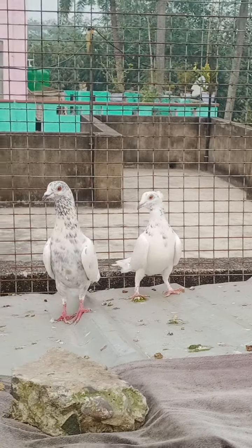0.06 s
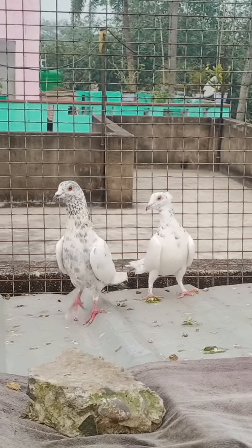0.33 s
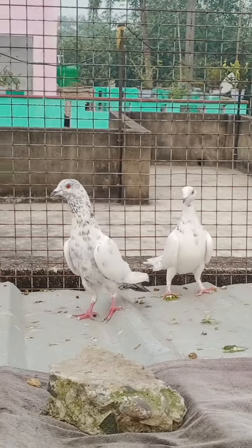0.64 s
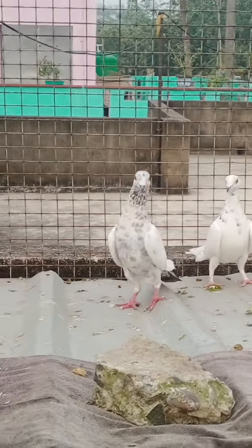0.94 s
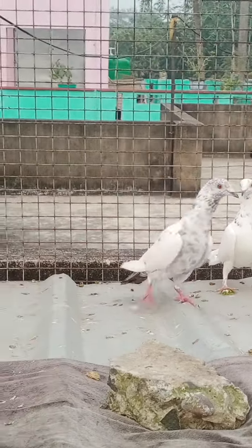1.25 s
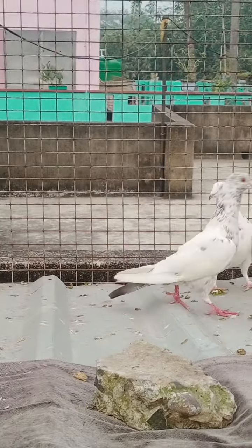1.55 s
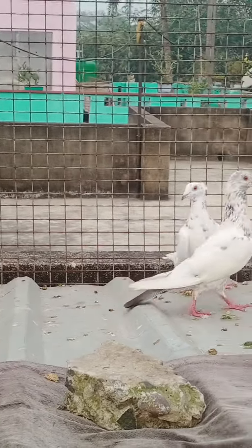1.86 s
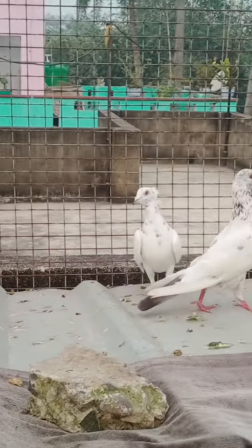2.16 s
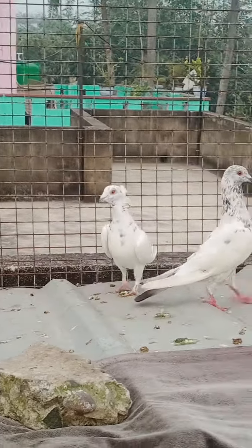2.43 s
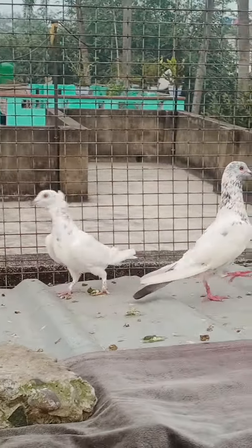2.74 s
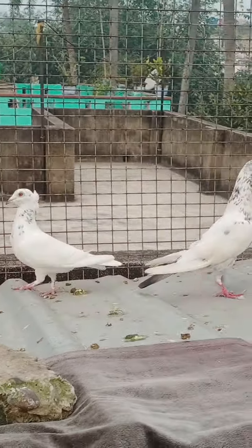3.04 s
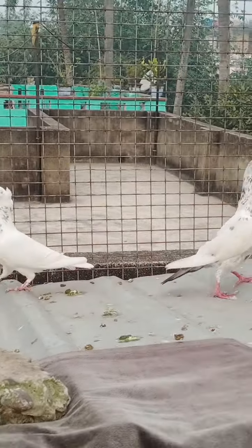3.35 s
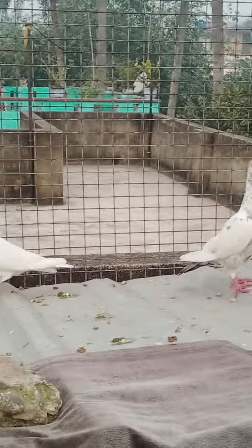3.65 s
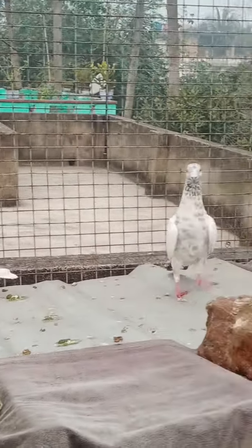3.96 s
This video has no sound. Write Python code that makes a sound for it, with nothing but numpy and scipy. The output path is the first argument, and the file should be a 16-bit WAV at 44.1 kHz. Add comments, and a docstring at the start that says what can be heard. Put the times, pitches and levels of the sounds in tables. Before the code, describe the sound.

Pigeon claws patter and tick on a sheet-metal roof while wild birds call around.

```python
"""Two pigeons walk on a sheet-metal roof, close to the microphone, in mono. Their claws patter, tick
and skid and set the metal ringing, their soles scuff, and the sheet flexes with a soft boom.
In the trees around, wild birds screech, whistle, squawk, trill and chirp, smeared by leaves and
echoed by walls. One bird calls long and low from far off, over a bed of quiet outdoor air."""
import sys
import numpy as np
from scipy import signal
from scipy.fft import rfft, irfft, next_fast_len
from scipy.io import wavfile
from scipy.ndimage import uniform_filter1d

SR = 44100
rng = np.random.default_rng(int(sys.argv[2]) if len(sys.argv) > 2 else 0)


def store_pcm(level_fs):
    """Save levels as 16-bit WAV."""
    pcm = np.round(np.clip(level_fs, -1, 1) * 32767).astype(np.int16)
    wavfile.write(sys.argv[1], SR, np.atleast_2d(pcm).T)


N = 176400

# footfalls (time [s], level [dB], claw patter [s], clank re level [dB], bright edge re level [dB])
FOOTFALLS = [(.395, -35.5, 0.027, -15, -12), (1.113, -37, 0.028, -13.5, -10),
             (1.522, -44.5, 0.018, -17, -9), (1.801, -36.5, 0.017, -32, -6), (2.137, -38.5, 0.038, -13, -5),
             (2.473, -42, 0.024, -24, -5.5), (2.556, -41, 0.0032, -38, -8.5),
             (2.690, -39.5, 0.031, -11, -13), (2.846, -39.5, 0.029, -12.5, -9),
             (3.431, -44, 0.043, -12, -10), (3.589, -44.5, 0.019, -59, -6),
             (3.788, -44.5, 0.021, -19, -11.5)]
# spectra of the sheet: its ring, low clank and bright edge when scratched (frequency [Hz], gain [dB])
RING_SPECTRUM = [(1500, -40.5), (2300, -16.5), (3200, -2), (4200, -3.5), (4800, -5), (5700, -0.5),
                 (6600, -7.5), (7500, -29.5), (9500, -43.5), (16000, -54.5)]
CLANK_SPECTRUM = [(100, -20.5), (350, -18.5), (560, 0.5), (850, -14.5), (1100, -4), (1450, 5),
                  (1900, -11.5), (2600, 0.5), (4000, -5), (9000, -72.5)]
SCRATCH_SPECTRUM = [(4000, -19), (7500, 1), (8600, -2), (9500, -17), (11300, -7), (13000, 3.5),
                    (15700, 1.5)]

RING_T60_S, CLANK_T60_S, EDGE_T60_S = 0.13, 0.17, 0.087
SCRATCHES_PER_S, SCRATCH_SCATTER_DB = 800, 7.5
FIRST_CLAW = 1.45  # strength of the first contact, against 1 for a typical one


def undb(db):
    """Decibels to gain."""
    return 10 ** (np.asarray(db) / 20)


def unit(x):
    """Scale to rms 1."""
    return x / np.sqrt(np.mean(x ** 2) + 1e-20)


def peak_level(x, db):
    """Set the level of the loudest 10 ms."""
    return x * undb(db) / np.sqrt(uniform_filter1d(x ** 2, SR // 100).max() + 1e-20)


def clock(length):
    """Sample times over a length in seconds."""
    return np.arange(max(int(length * SR), 8)) / SR


def add(out, start, x):
    """Mix a sound in at a time in seconds."""
    i = max(int(start * SR), 0)
    out[i:i + len(x)] += x[:max(N - i, 0)]


def colour(x, points):
    """Minimum-phase filter through (frequency [Hz], gain [dB]) points, scaled to unit power gain."""
    size = next_fast_len(len(x) + 2048) * 2
    hz, db = np.array(points, float).T
    log_hz = np.log(np.fft.rfftfreq(size, 1 / SR) + 1)
    gain = unit(undb(np.interp(log_hz, np.log(hz), db)))
    cepstrum = irfft(np.log(gain))
    cepstrum[1:size // 2] *= 2
    cepstrum[size // 2 + 1:] = 0
    return irfft(rfft(x, size) * np.exp(rfft(cepstrum)))[:len(x)]


def drift(t, rate):
    """Random drift that turns rate times a second."""
    return np.interp(t * rate, np.arange(2048), rng.standard_normal(2048))


def tail(t60):
    """Dense dying ring of unit energy."""
    t = clock(0.97)
    x = rng.standard_normal(len(t)) * np.exp(-np.log(1000) * t / t60)
    return x / np.linalg.norm(x)


def yard(x, wet_db, near_db=2):
    """On its way to the microphone a call is smeared by leaves and echoed by walls, treble dying first."""
    out = x + undb(near_db) * signal.fftconvolve(x, tail(t60=0.061))[:N]
    echo = sum(signal.sosfilt(signal.butter(4, 4600, band, fs=SR, output="sos"), tail(t60))
               for band, t60 in (("low", 0.65), ("high", 0.48)))
    add(out, 0.012, undb(wet_db) * signal.fftconvolve(x, echo))
    return out / np.sqrt(1 + undb(near_db) ** 2 + undb(wet_db) ** 2)


def voice(hz, harmonics_db=(0,)):
    """A bird's tone on a pitch curve."""
    phase = 2 * np.pi * np.cumsum(hz) / SR
    return np.sqrt(2) * sum(undb(db) * np.sin((k + 1) * phase) for k, db in enumerate(harmonics_db))


def notes(rows, waver, waver_hz, bend=1):
    """Gliding notes that swell and fade; the pitch wavers by a share of itself."""
    out = np.zeros(N)
    for start, length, first_hz, last_hz, db in rows:
        t = clock(length)
        progress = t / t[-1]
        glide = first_hz + (last_hz - first_hz) * progress ** bend
        hz = glide * (1 + waver * drift(t, waver_hz))
        swell = np.abs(np.sin(np.pi * progress)) ** 0.32
        add(out, start, undb(db) * swell * voice(hz))
    return out


def air():
    """Quiet outdoor air all around: it rises a little at first, then swells and sinks gently."""
    # background spectrum (frequency [Hz], gain [dB])
    spectrum = [(20, -12.5), (45, -8), (80, 5.5), (140, 6), (250, 3), (450, -5), (900, -6.5), (1500, -6),
                (2500, -15), (4000, -11), (6000, -23), (8000, -40), (16000, -49.5)]
    t = np.arange(N) / SR
    db = -67.3 - 2.5 * np.clip(1 - t / 0.81, 0, 1) + drift(t, rate=5)
    return unit(colour(rng.standard_normal(N), spectrum)) * undb(db)


def screeches():
    """A harsh call from the trees arches and falls; a fast uneven rasp widens every harmonic."""
    # calls (time [s], gain [dB], pitch scale [ratio])
    calls = [(.066, -42.5, 0.98), (.762, -42.5, 0.98)]
    # course of a call (time into it [s], unscaled pitch [Hz], gain [dB], roughness [share of pitch])
    contour = [(0, 2150, -25, .06), (.028, 2420, -15.5, .055), (.068, 2290, -7, .032), (.10, 2160, -4, .02),
               (0.136, 2010, -2.5, .016), (0.164, 1930, -4.5, .022), (.185, 1790, -13, .03)]
    # harmonics ahead of the throat, fundamental first (gain [dB])
    harmonics = [-18, 0, -6.5, -9, -23.5, -32, -29]
    # resonances of the throat (frequency [Hz], gain [dB])
    throat = [(1500, -27.5), (2400, 10), (4200, 2), (5100, 2), (6100, -0.5), (6700, -9), (7200, -27),
              (8600, -16.5), (9400, -21), (10400, -9.5), (12000, -21), (15000, -13)]
    at, pitch, level, rough = np.array(contour).T
    out, t = np.zeros(N), clock(at[-1])
    fade = np.clip(np.minimum(t, t[-1] - t) / 0.0024, 0, 1)
    rasp_filter = signal.butter(3, 256, fs=SR, output="sos")
    for start, db, scale in calls:
        flutter = 1 + np.interp(t, at, rough) * drift(t, rate=801)
        hz = scale * np.interp(t, at, pitch) * flutter
        rasp = unit(signal.sosfilt(rasp_filter, rng.standard_normal(len(t))))
        envelope = undb(db + np.interp(t, at, level)) * fade
        add(out, start, envelope * (0.75 + rasp) * voice(hz, harmonics))
    return yard(colour(out, throat), wet_db=5.5, near_db=5.5)


def whistles():
    """Distant birds whistle short, nearly level notes."""
    # notes (time [s], length [s], start pitch [Hz], end pitch [Hz], level [dB])
    calls = [(.09, 0.14, 2110, 2029, -56), (.32, 0.11, 2107, 2058, -61.5), (.45, 0.069, 2103, 1961, -60.5),
             (.51, 0.054, 3830, 3796, -55.5), (.66, 0.1, 2180, 2065, -60.5), (.69, 0.19, 1390, 1316, -61.5),
             (.87, 0.12, 2155, 2044, -60), (.87, 0.19, 1344, 1327, -58), (1.05, 0.054, 1283, 1395, -55.5),
             (1.27, 0.085, 2180, 2050, -59.5), (1.29, 0.1, 1369, 1440, -55),
             (1.415, 0.029, 3740, 3570, -52), (1.46, 0.094, 3433, 3583, -54),
             (1.47, 0.066, 2187, 2130, -58), (1.68, 0.121, 1439, 1479, -52),
             (1.92, 0.097, 2030, 1976, -62.5), (2.125, 0.081, 1496, 1553, -46.5),
             (2.195, .04, 2700, 2760, -48), (2.43, 0.019, 1890, 1880, -61),
             (3.29, 0.044, 2750, 2766, -49.5), (3.38, 0.098, 3850, 4040, -55.5),
             (3.8, 0.095, 3000, 2686, -58), (3.84, 0.089, 3310, 3310, -61.5), (3.84, 0.07, 1480, 1565, -57)]
    return notes(calls, waver=0.019, waver_hz=271)


def claws(t, rate, scatter_db):
    """Random tiny contacts of uneven strength, about rate a second."""
    contacts = rng.random(len(t)) < rate / SR
    return contacts * undb(scatter_db * np.clip(rng.standard_normal(len(t)), -2, 2))


def sheet(push, spectrum, t60):
    """The sheet's answer to contacts: a crack and a dense short ring."""
    ring = tail(t60)[:SR // 4]
    ring[0] += 0.38  # the crack
    return signal.fftconvolve(push, colour(ring, spectrum))


def ring_modes(t, modes):
    """Separate modes of the sheet, each a dying sine."""
    return sum(undb(db) * np.sin(2 * np.pi * hz * t) * np.exp(-np.log(1000) * t / t60)
               for hz, db, t60 in modes)


def steps():
    """Close by, each foot lands claw after claw; the low clank builds a little later."""
    # clear modes that ring on after a footfall (frequency [Hz], relative level [dB], t60 [s])
    clear_modes = [(1074, -18, 0.23), (1240, -13, 0.56), (1364, 2, 0.21), (5630, 21, 0.023),
                   (6010, 9.5, 0.026)]
    # the claw's bright edge (frequency [Hz], gain [dB])
    edge_spectrum = [(4000, -39), (7500, -1), (8500, -13), (9400, -17), (11400, -9), (13000, 0),
                     (15700, 0.5)]
    out, t = np.zeros(N), clock(0.2)
    clear_ring = ring_modes(t, clear_modes)
    for start, db, patter_s, clank_db, edge_db in FOOTFALLS:
        push = claws(t, rate=450, scatter_db=7) * np.exp(-(t / patter_s) ** 4)
        push[0] = FIRST_CLAW
        push *= 1 - 0.15 * np.exp(-t / 0.0035)  # the first claw's click is slightly softened
        add(out, start, peak_level(sheet(push, RING_SPECTRUM, RING_T60_S), db))
        add(out, start, peak_level(signal.fftconvolve(push, clear_ring), db - 11.5))
        clank = sheet(push, CLANK_SPECTRUM, CLANK_T60_S)
        add(out, start + 0.008, peak_level(clank, db + clank_db))
        edge = sheet(push * np.exp(-t / patter_s), edge_spectrum, EDGE_T60_S)
        add(out, start, peak_level(edge, db + edge_db))
    return out


def boom():
    """The whole panel flexes under shifts of weight, and faintly under every step."""
    # low modes of the panel at speed 1 (frequency [Hz], level [dB], t60 [s])
    low_modes = [(69.4, -55, 1), (79.9, -46, 0.82), (125.7, -54, 0.69)]
    # shifts of weight (time [s], gain [dB], speed of vibration and decay [ratio])
    flexes = [(0.407, -4, 0.86), (1.512, -19, 1.07), (1.62, -18, 1.34), (2.127, -25, 0.9), (2.471, -20, 1),
              (3.163, -7.5, 1.7), (3.719, -22, 1.9)]
    thuds = [(start, -34, 1) for start, *_ in FOOTFALLS]
    out, t = np.zeros(N), clock(0.79)
    attack = 1 - np.exp(-t / 0.011)
    for start, db, speed in flexes + thuds:
        add(out, start, undb(db) * ring_modes(t * speed, low_modes) * attack)
    return out


def ticks():
    """One claw tip snaps against the metal and scratches on for a moment."""
    # claw snaps (time [s], level [dB], pitch of the ring [Hz], bright edge re level [dB])
    snaps = [(.685, -44, 5470, -16), (1.025, -51, 6400, -11.5), (1.17, -44.5, 4300, -15),
             (1.605, -56, 4840, -8), (1.635, -53.5, 5500, -20), (2.062, -55.5, 5520, -13),
             (2.242, -51, 5100, -12), (2.269, -48.5, 4930, -17), (2.359, -49, 5600, -10.5),
             (2.404, -51.5, 5700, -5.5), (2.644, -58, 4970, -11), (2.945, -55, 5730, -4.5),
             (2.976, -53, 5230, -11), (3.466, -47, 4240, -17), (3.668, -49, 4420, -22),
             (3.715, -57, 4700, -19), (3.951, -60, 5800, -1.5)]
    out, t = np.zeros(N), clock(0.1)
    for start, db, hz, edge_db in snaps:
        push = claws(t, SCRATCHES_PER_S, SCRATCH_SCATTER_DB) * undb(-22) * np.exp(-t / 0.03)
        push[0] = FIRST_CLAW
        spectrum = [(1500, -36), (hz * 0.56, -21), (hz * 0.79, -8), (hz, 0),
                    (6600, -10), (7600, -23), (10000, -38)]
        add(out, start, peak_level(sheet(push, spectrum, t60=0.066), db))
        add(out, start, peak_level(sheet(push, SCRATCH_SPECTRUM, t60=0.066), db + edge_db))
    return out


def squawks():
    """Short calls from the trees, hoarse with a fast waver of pitch."""
    # squawks (time [s], length [s], start pitch [Hz], end pitch [Hz], level [dB])
    calls = [(1.18, 0.098, 2097, 1935, -59.5), (1.19, 0.1, 3200, 2700, -58.5),
             (2.045, 0.033, 2264, 2146, -62), (2.185, 0.04, 1130, 1074, -57), (2.25, 0.035, 960, 918, -57),
             (3.055, .07, 1326, 1178, -59), (3.205, 0.026, 2603, 2390, -50.5),
             (3.268, 0.026, 1810, 1915, -58), (3.335, 0.044, 2340, 1960, -42),
             (3.53, 0.093, 3693, 3490, -46.5), (3.95, 0.089, 1067, 1066, -48.5)]
    return notes(calls, waver=0.05, waver_hz=614)


def shifting_resonances(x):
    """As the toes move over the metal, its resonances swell and fade one by one."""
    out, t, spectrum = np.zeros(N), np.arange(N) / SR, rfft(x)
    band_position = 5 * np.log2(1 + np.fft.rfftfreq(N, 1 / SR) / 1000)
    for k in range(23):
        band = irfft(spectrum * np.clip(1 - abs(band_position - k), 0, 1), N)
        out += band * undb(4 * np.clip(drift(t, rate=24), -2, 1.5))
    return out


def scuffs():
    """Soles slide and toes scratch: swells of tiny contacts over a faint shuffle."""
    # faint scratching of toes as the birds get moving (time [s], level [dB])
    shuffle = [(0, -100), (1.1, -95), (1.22, -60), (1.45, -79), (1.62, -63.5), (2.0, -65.5), (2.3, -63.5),
               (2.65, -57), (2.8, -63), (3.0, -56.5), (3.13, -64), (3.28, -61.5), (3.39, -68), (3.65, -62),
               (3.92, -70), (4, -72)]
    # sliding soles (time just past the peak [s], level [dB], half length [s],
    # clank re level [dB], bright edge re level [dB])
    slides = [(1.326, -57.5, 0.037, -6, -27), (2.092, -52, 0.026, -28, -15.5), (2.286, -47, 0.02, -7, -12),
              (2.646, -57.5, 0.1, -2, -9), (2.746, -59.5, 0.039, 6, -19), (3.014, -52.5, 0.027, -18, -20),
              (3.056, -51.5, 0.021, -1, -13.5), (3.172, -56, .018, -18, -7),
              (3.208, -47.5, 0.022, -2, -15.5), (3.299, -56.5, 0.042, -4.5, -17),
              (3.451, -54.5, 0.029, -7, -14), (3.499, -44, 0.012, 0, -17), (3.523, -43, 0.0072, 2, -17),
              (3.662, -57.5, 0.033, -8.5, -10), (3.729, -53.5, 0.032, -3.5, -13),
              (3.816, -59.5, 0.062, 4, -13), (3.903, -65.5, 0.032, -8, -1), (3.971, -57, 0.025, -2.5, -13)]
    t = np.arange(N) / SR
    slide = undb(np.interp(t, *np.array(shuffle).T))
    press, scratch = slide * undb(-21.5), slide * undb(-23)
    for time, db, half_s, clank_db, edge_db in slides:
        swell = undb(db) * np.exp(-((t - time + 0.0079) / half_s) ** 2)
        slide = np.hypot(slide, swell)
        press = np.hypot(press, swell * undb(clank_db))
        scratch = np.hypot(scratch, swell * undb(edge_db))
    grit = unit(claws(t, SCRATCHES_PER_S, SCRATCH_SCATTER_DB) * rng.choice([-1, 1], N))
    ring = sheet(grit * slide, RING_SPECTRUM, RING_T60_S)
    clank = sheet(grit * press, CLANK_SPECTRUM, CLANK_T60_S)
    edge = sheet(grit * scratch, SCRATCH_SPECTRUM, EDGE_T60_S)
    return shifting_resonances((ring + clank + edge)[:N])


def hoots():
    """Drawn-out, slightly arched low calls from a bird far away, with an uneven throb."""
    # calls (time [s], length [s], start pitch [Hz], pitch at the bend [Hz], end pitch [Hz], level [dB])
    calls = [(1.481, 0.046, 556, 686, 660, -56), (1.841, 0.044, 635, 610, 578, -53.5),
             (1.967, 0.063, 610, 639, 580, -60.5), (2.084, 0.13, 595, 676.6, 613, -53.5),
             (2.508, 0.34, 694, 731.3, 688, -56.5), (2.746, 0.24, 684.7, 663, 618.7, -54.5),
             (2.994, 0.305, 659.5, 623, 589, -66.5), (3.528, 0.201, 636.5, 691, 662, -56.5),
             (3.737, 0.27, 668.5, 639.4, 596, -55.5)]
    out = np.zeros(N)
    for start, length, first_hz, bend_hz, last_hz, db in calls:
        t = clock(length)
        arch = np.interp(t / length, [0, 0.35, 1], [first_hz, bend_hz, last_hz])
        hz = arch * (1 + 0.026 * drift(t, rate=122.1))
        fade = np.clip(np.minimum(t, t[-1] - t) / 0.018, 0, 1)
        throb = 1 + 0.3 * drift(t, rate=70)
        add(out, start, undb(db) * fade * throb * voice(hz, harmonics_db=(0, -24)))
    return yard(out, wet_db=-6, near_db=-29)


def trill():
    """A sinking run of falling notes from the trees; a wall repeats each one faintly in the gaps."""
    # notes of the run (time [s], middle pitch [Hz], level [dB])
    run = [(1.565, 3560, -52.5), (1.62, 3450, -52), (1.68, 3415, -50.5), (1.753, 3284, -48),
           (1.821, 3260, -45.5), (1.895, 3237, -44.5), (1.974, 3218, -45), (2.048, 3123, -47.5),
           (2.117, 3140, -44), (2.193, 3076, -44.5), (2.271, 3065, -46.5), (2.343, 3010, -50.5),
           (2.411, 2986, -46.5), (2.478, 2980, -49.5), (2.545, 2954, -49), (2.62, 2960, -53)]
    note_s, fall_hz, echo_s = 0.048, 540, 0.034
    rows = [(start, note_s, hz + fall_hz / 2, hz - fall_hz / 2, db) for start, hz, db in run]
    direct = notes(rows, waver=0.009, waver_hz=703)
    out = direct.copy()
    add(out, echo_s, undb(-10) * direct)
    return yard(out, wet_db=-3.5, near_db=-11)


def chirps():
    """Quick, clean upward sweeps from a bird in the trees."""
    # chirps (time [s], length [s], start pitch [Hz], end pitch [Hz], level [dB])
    calls = [(1.704, 0.029, 3430, 4580, -38), (1.899, .028, 3535, 4300, -39)]
    return yard(notes(calls, waver=0.0057, waver_hz=180, bend=1.4), wet_db=-3, near_db=-9)


def skids():
    """Close by, claws skid on the metal with a thin squeak."""
    # squeaks (time [s], length [s], start pitch [Hz], end pitch [Hz], level [dB])
    squeaks = [(2.836, 0.033, 5770, 5920, -39), (2.89, .1, 6000, 5700, -60.5),
               (3.424, 0.024, 5520, 5830, -46)]
    return notes(squeaks, waver=0.021, waver_hz=900)


def scene():
    """One microphone: feet on the roof close and dry, birds and air behind."""
    feet = steps() + ticks() + scuffs() + boom() + skids()
    birds = screeches() + chirps() + trill() + yard(whistles() + squawks(), wet_db=-4) + hoots()
    return (feet + birds + air())[None]


def record(dry):
    """The recorder cuts the top steeply, just under 16 kHz."""
    return signal.sosfilt(signal.ellip(8, 0.2, 70, 15950, fs=SR, output="sos"), dry)


dry = scene()
out = record(dry)
store_pcm(out)
```